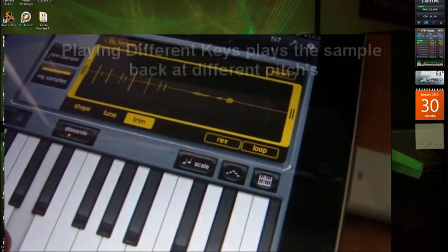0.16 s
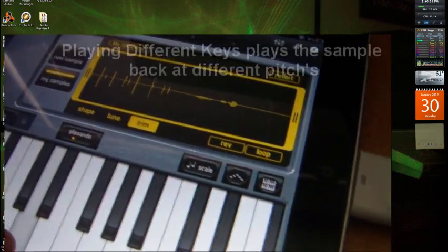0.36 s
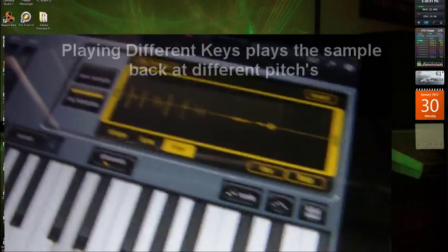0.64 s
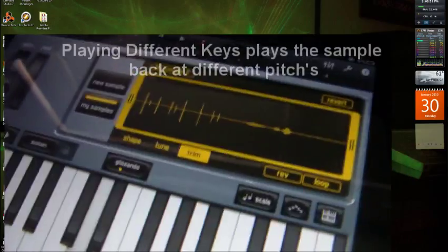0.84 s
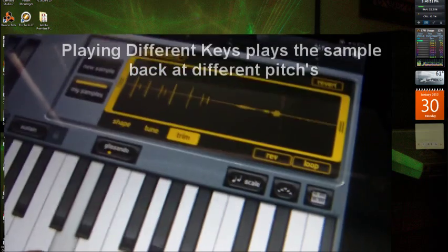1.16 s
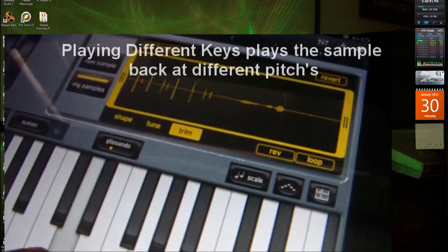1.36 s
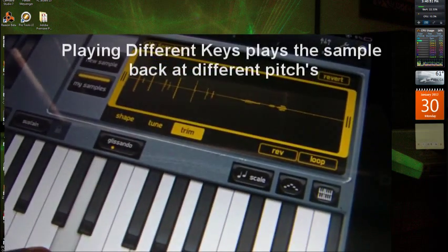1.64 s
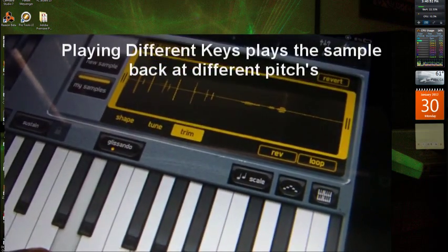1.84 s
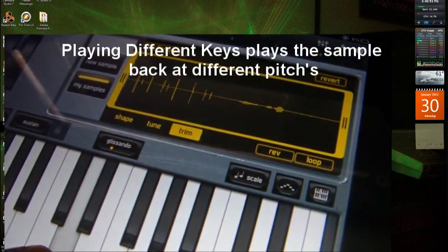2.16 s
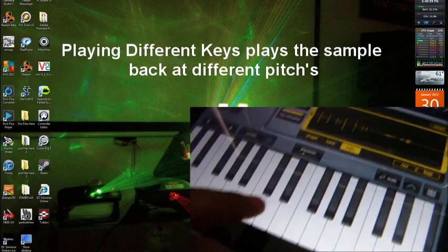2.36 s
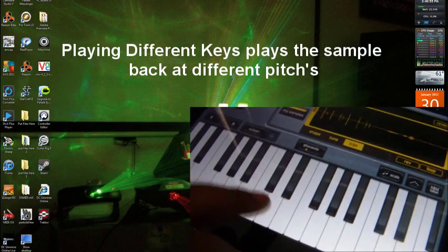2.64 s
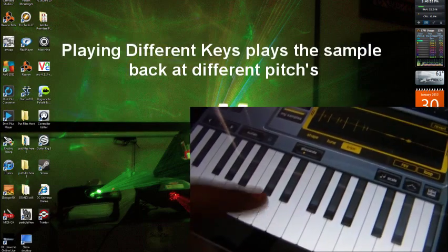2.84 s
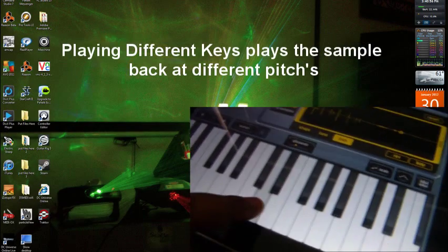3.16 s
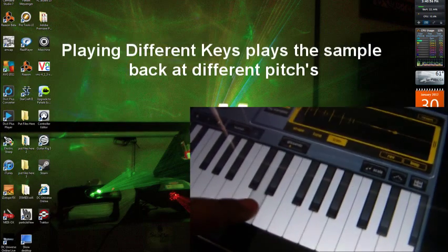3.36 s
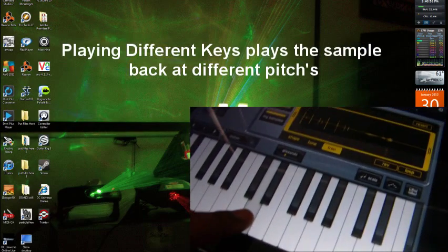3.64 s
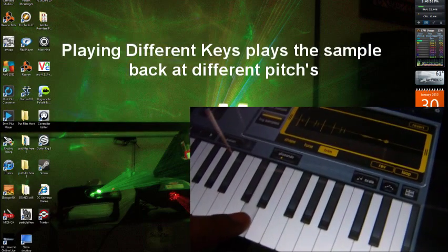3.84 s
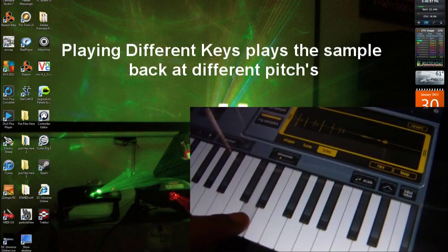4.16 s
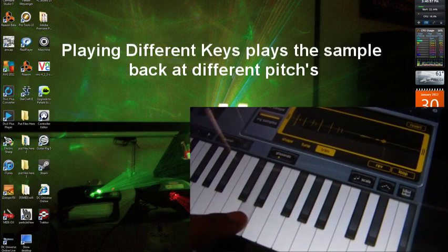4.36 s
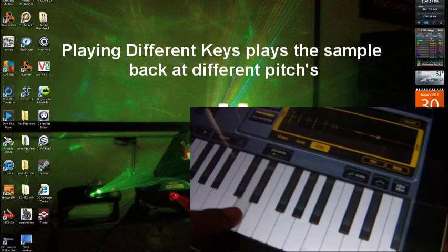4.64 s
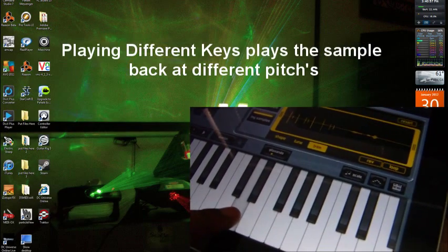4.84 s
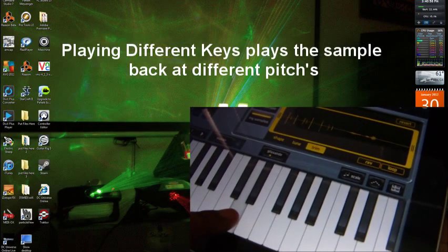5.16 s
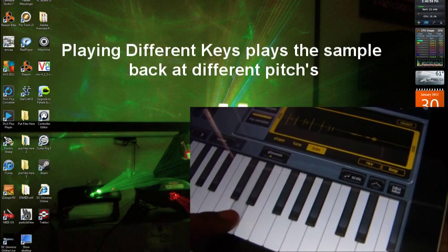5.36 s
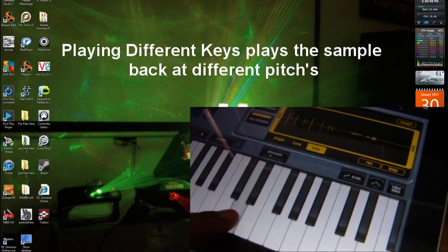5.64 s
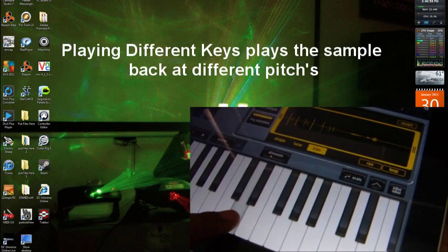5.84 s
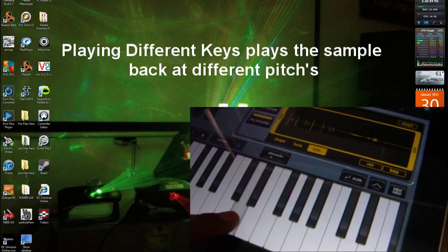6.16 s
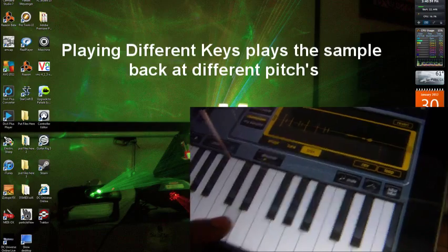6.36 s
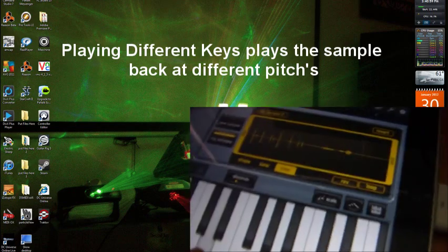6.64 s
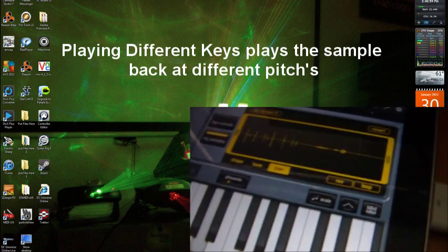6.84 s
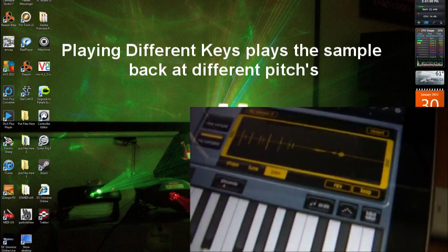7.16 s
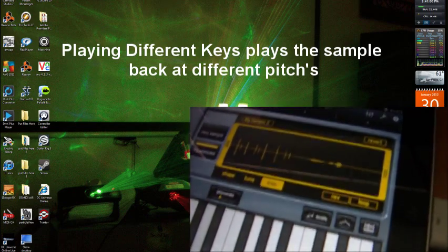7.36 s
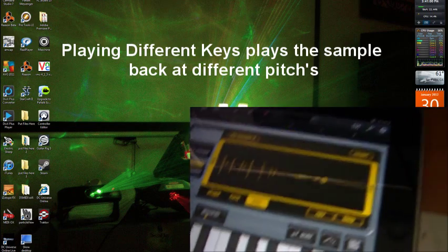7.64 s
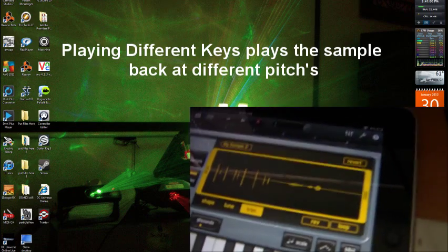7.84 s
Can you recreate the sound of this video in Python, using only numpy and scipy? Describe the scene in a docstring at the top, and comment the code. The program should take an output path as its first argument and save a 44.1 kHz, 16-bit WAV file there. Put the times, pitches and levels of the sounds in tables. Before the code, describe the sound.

A steady low hum of fans and mains electricity fills a small, quiet room throughout, with faint hiss. Close to the microphone, a fingertip taps a tablet's glass, each tap a short, dull, nearly dry thump with a faint tick on top. Four light taps fall at about 0.4, 1.2, 1.5 and 1.9 seconds. From 3 seconds they come harder and unevenly: strong ones at 3, 3.7, 4.4, 5.9 and 6.8 seconds, with softer ones near 4, 5.2 and 5.4. Two lighter taps close it at 7.5 and 7.8 seconds. The hand-held camera adds faint handling noise: brief muffled rubs of skin around 0.7, 2.4 and 5.6 seconds, and small plastic clicks near 1.6, 6.7 and 7.2 seconds, the first with a tiny metallic ring.

```python
"""A quiet, small room; a hand-held camera's stereo microphone is close to a tablet. Fans and mains hum
behind from the start. A finger taps the glass four times, lightly: each a short dull thump with a faint
tick on top. From 3 s the taps come harder, and the camera's fast limiter flattens the hardest. Now and
then the hand rubs the camera and its case clicks, last at 7.2 s. Two lighter taps end it, just before 8 s."""
import sys
import numpy as np
from scipy import signal
from scipy.fft import rfft, irfft, next_fast_len
from scipy.io import wavfile
from scipy.ndimage import map_coordinates

SR = 44100
rng = np.random.default_rng(int(sys.argv[2]) if len(sys.argv) > 2 else 0)


def digitize_waveform(pressure):
    """Quantize a signal to 16-bit integers and store it at the path in sys.argv[1].

    Rows of a 2-D input are taken as channels; values are limited to [-1, 1].
    """
    field = np.atleast_2d(pressure).T
    bounded = np.clip(field, -1, 1)
    quanta = np.round(bounded * 32767).astype(np.int16)
    wavfile.write(sys.argv[1], SR, quanta)


N = 352662

# Noise colours, shape only. Columns: frequency_hz, density_db
MIC_HISS = [(100, -23), (1000, -6), (3500, 0), (7000, -0.5), (11900, -5), (15800, -18.5)]  # the microphone's own noise
FAN_RUMBLE = [(12, -6), (30, -7.5), (48, 1.5), (60, -8), (80, 1), (105, 0), (140, 0), (180, -3), (215, -7),
              (250, -6.5), (285, -14.5), (325, -23.5), (500, -46)]  # the low end of the fans
FAN_AIR = [(180, -38.5), (300, -2), (340, -9.5), (372, 0.5), (398, -2.5), (545, -7.5), (676, -10),
           (942, -15), (1020, -12), (1230, -15.5), (2050, -20), (3490, -31), (8000, -49)]  # the air they move
GRIP_SKIN = [(120, -13), (250, 1.5), (450, -4.5), (600, -16), (1000, -18), (2500, -48)]  # skin on the camera's case
CLICK_SNAP = [(800, -20), (2000, -11), (4000, 4), (7000, 2.5), (10000, -5), (12200, -4), (14500, -14)]  # the bright edge of a click
CLICK_BODY = [(200, 6), (600, 9.5), (1300, 4.5), (2100, 1), (3200, -9), (8000, -43)]  # its dull body
# How alike a noise is at the microphone's two ports: frequency_hz, correlation
PORT_LIKENESS = [(200, 0.98), (500, 0.95), (1400, 0.97), (2800, .62), (5600, 0), (10000, 0), (15000, 0.028)]
# Fan and mains tones, and a thin electronic whine: pitch_hz, rms_db
HUM_TONES = [(48.4, -56.5), (140, -52.5), (177.6, -51), (249, -65), (283, -65), (376.8, -66.5),
             (748.3, -74.5), (883, -75.5), (1000, -71.5), (1287, -92), (1624, -78.5), (2000, -83),
             (2087, -80.5), (2165, -82.5), (2998, -85), (4000, -85), (9000, -98.5)]
# The room's decay: frequency_hz, t60_s
ROOM_DECAY = [(200, 0.085), (2000, 0.49), (6000, 0.25), (14000, 0.07)]
# The hand shifting its grip: middle_s, half_length_s, level_db
GRIP_RUBS = [(.71, 0.041, -51), (2.31, .03, -55), (2.55, .04, -54), (5.552, 0.021, -44), (5.695, 0.1, -49),
             (6.556, .04, -56.5)]
# Clicks of the camera's case: start_s, snap_db, body_db, ring_db
CASE_CLICKS = [(1.5505, -50.5, -39, -41.5), (1.575, -47, -57, -62), (3.01, -55.5, -41, -68),
               (6.7377, -46, -39.5, -56), (6.7608, -57, -53.5, -61), (6.772, -59, -57, -64),
               (7.1972, -54, -48, -70)]
# Ringing modes. Columns: pitch_hz, relative_db, t60_s
METAL_MODES = [(3200, -21, 0.066), (4000, -14, 0.087), (5596, -4, 0.13), (6600, -16, 0.12),
               (12020, -22, .05)]  # a small metal part inside the camera
SHELL_MODES = [(401, -24, 0.015), (442, -34.5, 0.02), (535, -29, 0.019), (625, -37, 0.031)]  # the tablet's shell bending
GLASS_MODES = [(1054, -48.5, 0.019), (1400, -45.5, 0.0086), (1720, -51.5, 0.013), (3390, -60, 0.01),
               (4840, -67.5, .012), (6620, -66.5, 0.013)]  # the glass under the finger
# Finger taps; knock and tick are gains on top of the tap's level:
# start_s, level_db, pitch_hz, knock_db, tick_db, brightness_db_per_octave
FINGER_TAPS = [(.428, 1.5, 126, 1, -4, 0), (1.1894, -1, 135, 4, -4, 0), (1.4546, -4.5, 137, -1, -7, 0),
               (1.9099, 6, 140, -1, 2, 2), (2.9978, 17.5, 125.6, -2.5, 1, -2.5),
               (3.6549, 15.5, 135.3, 6, -1, 0), (3.9675, -0.3, 131.5, -7, -1, 4),
               (4.41, 13, 125, 4.5, -1.5, 4), (5.1724, 9, 132.4, 2.5, -.5, -2),
               (5.4374, 5, 136.6, -1, 0, 3), (5.8923, 15, 137, 5.5, 3, 0.5), (6.8265, 14.5, 139, 5, -4, 4),
               (7.4914, 7, 137.6, 3.5, 1.5, 1), (7.8167, 4.5, 132, -4, -2, 0)]


def amp(db):
    """Decibels to gain."""
    return 10 ** (np.asarray(db) / 20)


def unit(x):
    """Scale to rms 1."""
    return x / np.sqrt(np.mean(x ** 2) + 1e-20)


def rise(t, rise_s):
    """An onset easing from 0 to 1."""
    return 1 - np.exp(-t / rise_s)


def fade(t, t60_s):
    """Free decay, 60 dB in t60_s."""
    return amp(-60 * t / t60_s)


def mode(t, hz, db, t60_s):
    """One struck mode: a dying sine."""
    return amp(db) * np.sin(2 * np.pi * hz * t) * fade(t, t60_s)


def along(points, hz):
    """Read (frequency, value) points on a log axis."""
    freqs, values = np.transpose(points)
    return np.interp(np.log(hz + 1), np.log(freqs + 1), values)


def wobble(per_s):
    """A smooth random curve with per_s knots a second."""
    knots = rng.standard_normal(int(N * per_s / SR) + 4)
    coarse = np.arange(0, N + 256, 256)
    return np.interp(np.arange(N), coarse, map_coordinates(knots, [coarse * per_s / SR]))


def filtered(x, response):
    """Shape x by a frequency response."""
    size = next_fast_len(N + SR // 2)
    return irfft(rfft(x, size) * response(np.fft.rfftfreq(size, 1 / SR)), size)[..., :N]


def noise(spectrum):
    """Stereo noise of rms 1: near mono in the bass, unrelated in the treble."""
    def colour(hz):
        width = np.arccos(np.clip(along(PORT_LIKENESS, hz), -1, 1)) / 2
        return amp(along(spectrum, hz)) * [np.cos(width), np.sin(width)]
    mid, side = filtered(rng.standard_normal((2, N)), colour)
    return unit(np.array([mid + side, mid - side]))


def add(track, start_s, sound):
    """Mix a sound into the track."""
    part = track[round(start_s * SR):][:len(sound)]
    part += sound[:len(part)]


def fans():
    """In the background: rumble, soft air and hum tones, each wavering about a steady level."""
    t = np.arange(N) / SR
    drift_db, flutter_db = 0.8 * wobble(per_s=1.2), 0.86 * wobble(per_s=7)
    rumble = amp(-42.8 + drift_db + flutter_db) * noise(FAN_RUMBLE)
    air = amp(-54.5 + 0.1 * wobble(per_s=1.2)) * noise(FAN_AIR)
    hum = np.zeros(N)
    for hz, rms_db in HUM_TONES:
        peak = np.sqrt(2) * amp(rms_db + 1.25 * wobble(per_s=2.99))
        hum += peak * np.sin(2 * np.pi * hz * t + 0.71 * wobble(per_s=5))
    return rumble + air + hum


def room(x):
    """A small furnished room's diffuse answer, different on each side of the microphone."""
    hz, t, spectra = signal.stft(rng.standard_normal((2, SR // 3)), SR, nperseg=256)
    decay = fade(t, along(ROOM_DECAY, hz)[:, None])
    _, tail = signal.istft(spectra * decay, SR, nperseg=256)
    return signal.fftconvolve(x, tail / np.linalg.norm(tail[0]), axes=1)[:, :N]


def grip():
    """Handling noise: skin drags on the camera's case in short, muffled swells."""
    t = np.arange(N) / SR
    swells = sum(amp(db) * np.exp(-((t - middle_s) / half_s) ** 2) for middle_s, half_s, db in GRIP_RUBS)
    return swells * noise(GRIP_SKIN)


def case_clicks():
    """Right at the microphone, plastic parts snap together and set a small metal part ringing."""
    snap, body, metal = np.zeros((3, N))
    t = np.arange(SR // 4) / SR
    onset = rise(t, 0.00039)
    for start_s, snap_db, body_db, ring_db in CASE_CLICKS:
        ring = sum(mode(t, hz, db + rng.normal(0, 1), t60_s) for hz, db, t60_s in METAL_MODES)
        add(snap, start_s, amp(snap_db) * onset * fade(t, t60_s=0.072))
        add(body, start_s, amp(body_db) * onset * fade(t, t60_s=0.088))
        add(metal, start_s, amp(ring_db) * ring * rise(t, 0.0021))
    rattle = unit(amp(2.5 * wobble(per_s=120)))  # the part sits loosely, so its ring flutters
    return snap * noise(CLICK_SNAP) + body * noise(CLICK_BODY) + metal * rattle


def glass_tick(t, brightness_db_per_octave):
    """First contact rings the glass: a faint tick, brighter or duller from tap to tap."""
    pivot_hz = 2000
    glass = np.zeros_like(t)
    for hz, db, t60_s in GLASS_MODES:
        tilt_db = brightness_db_per_octave * np.log2(hz / pivot_hz)
        # every spot on the glass ticks a little differently
        glass += mode(t, hz * rng.normal(1, 0.04), db + tilt_db + rng.normal(0, 2), t60_s)
    return glass * rise(t, 0.00076)


def shell_knock(t, thump_hz):
    """The tablet's shell bends and gives a short knock whose pitch follows the thump's."""
    usual_thump_hz = 136.3
    tuning = (thump_hz / usual_thump_hz) ** 0.91
    lowest, *higher = [mode(t, hz * tuning, db, t60_s) for hz, db, t60_s in SHELL_MODES]
    return (lowest - sum(higher)) * rise(t, 0.0043)  # the higher modes start against the push


def finger_taps():
    """Close up, the soft pad pushes the whole tablet into a few low swings, with a knock and a tick."""
    track, t = np.zeros(N), np.arange(SR // 5) / SR
    flatten_s = 0.005
    push = 1 - np.exp(-(t / flatten_s) ** 2.39)  # the force builds as the pad flattens
    sway = mode(t, hz=44.0, db=-28.0, t60_s=0.059)  # the tablet rocks on its support
    for start_s, level_db, pitch_hz, knock_db, tick_db, brightness in FINGER_TAPS:
        thump = np.sin(2 * np.pi * pitch_hz * t) * push * fade(t, t60_s=0.037)
        knock = amp(knock_db) * shell_knock(t, pitch_hz)
        tick = amp(tick_db) * glass_tick(t, brightness)
        add(track, start_s, amp(level_db) * (thump + sway + knock + tick))
    return track


def scene():
    """At the microphone: taps close, nearly dry, a little left; clicks with some room; fans behind."""
    pan_db = 0.38
    tablet = finger_taps() * amp([[pan_db], [-pan_db]])
    case = case_clicks()
    reverb = room(amp(-42.5) * tablet + amp(-11) * case)
    sound = tablet + case + reverb + grip() + fans()
    lead_s = np.array([[-0.5], [0.5]]) / SR  # the right port hears everything one sample earlier
    hiss = amp(-67.5) * noise(MIC_HISS)
    return filtered(sound, lambda hz: np.exp(2j * np.pi * hz * lead_s)) + hiss


def limiter(x, ceiling_db, release_s, attack_s, ahead_s):
    """The gain ducks just before a peak passes the ceiling and recovers within milliseconds."""
    excess = np.log(np.maximum(np.abs(x.mean(axis=0)) / amp(ceiling_db), 1))
    recovery = np.arange(N) / SR / release_s
    gain = np.exp(recovery - np.maximum.accumulate(excess + recovery))
    lag_s = np.arange(-SR // 200, SR // 200 + 1) / SR
    ease = np.exp(-0.5 * ((lag_s + ahead_s) / attack_s) ** 2)
    return x * (1 + signal.fftconvolve(gain - 1, ease / ease.sum(), "same"))


def record(dry):
    """The camera limits the peaks and keeps nothing above its band limit."""
    limited = limiter(dry, ceiling_db=-12.0, release_s=0.003, attack_s=0.00089, ahead_s=0.00032)
    return filtered(limited, lambda hz: hz < 15750)


dry = scene()
out = record(dry)
digitize_waveform(out)
```